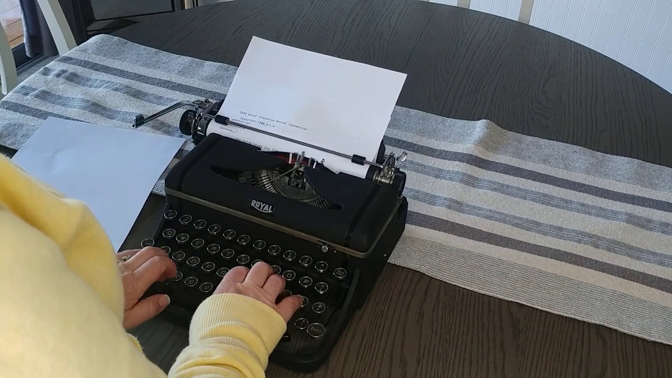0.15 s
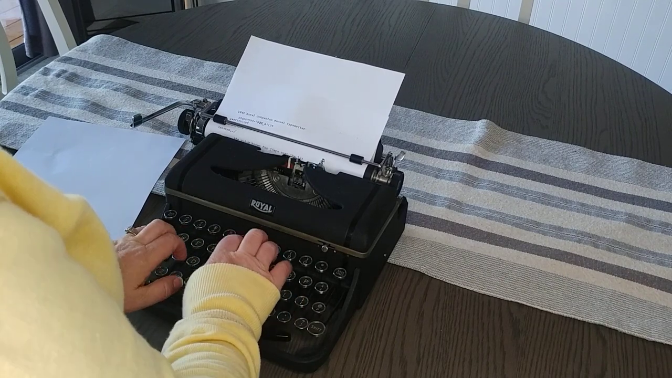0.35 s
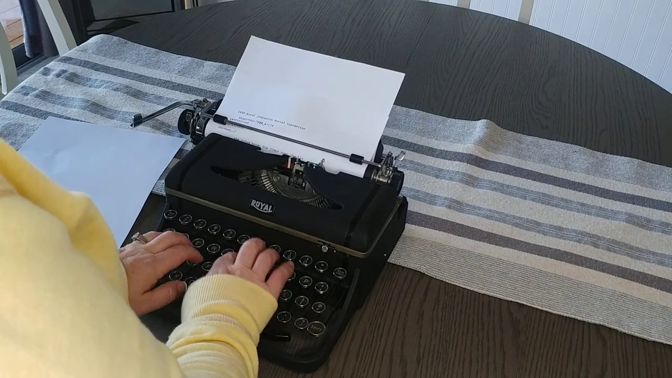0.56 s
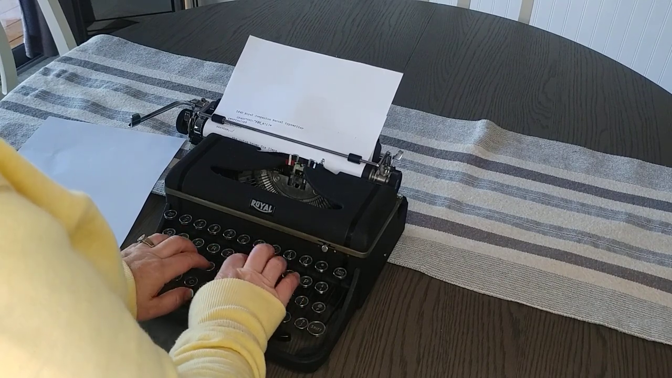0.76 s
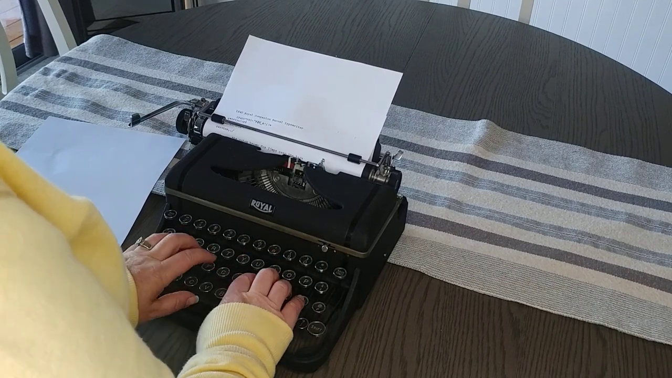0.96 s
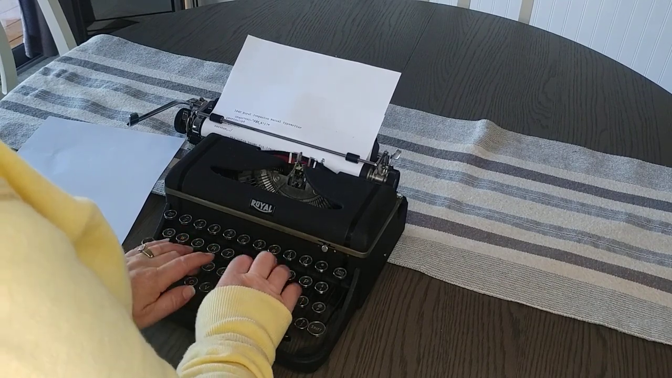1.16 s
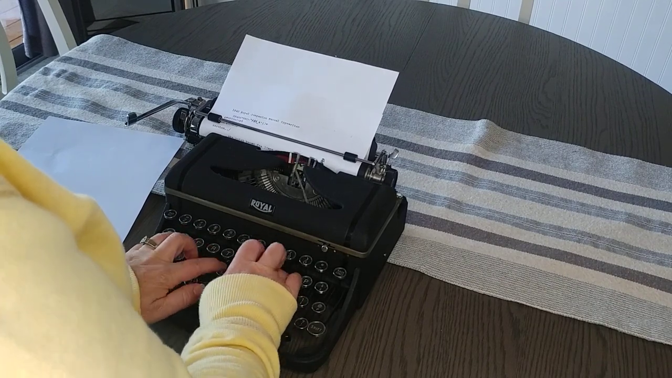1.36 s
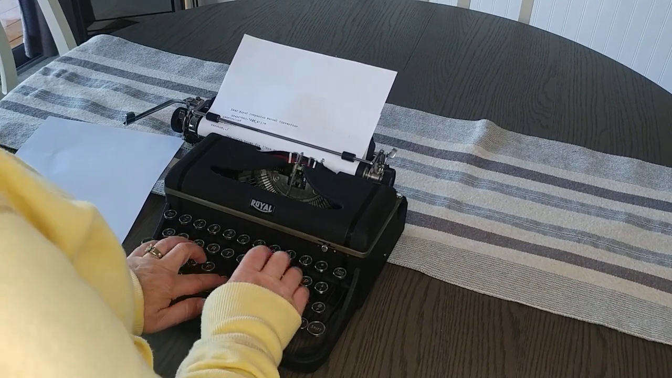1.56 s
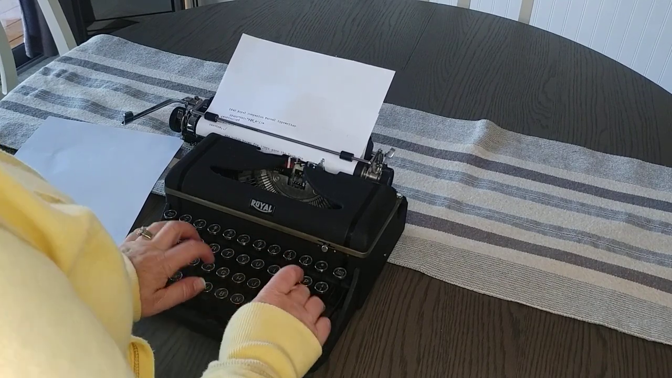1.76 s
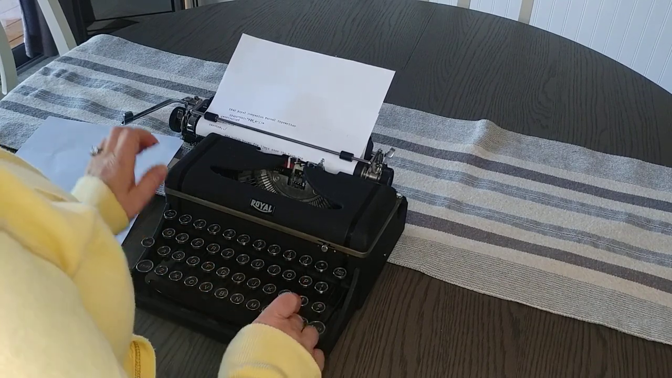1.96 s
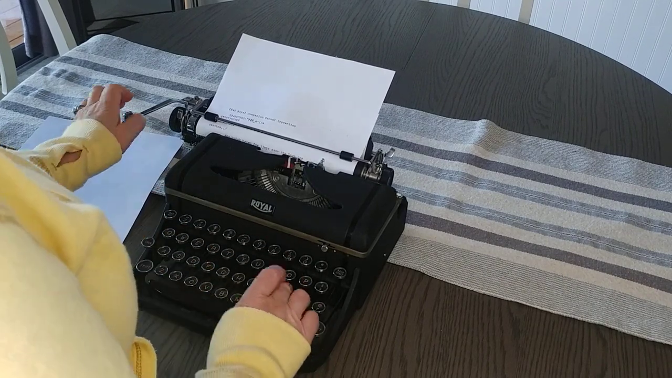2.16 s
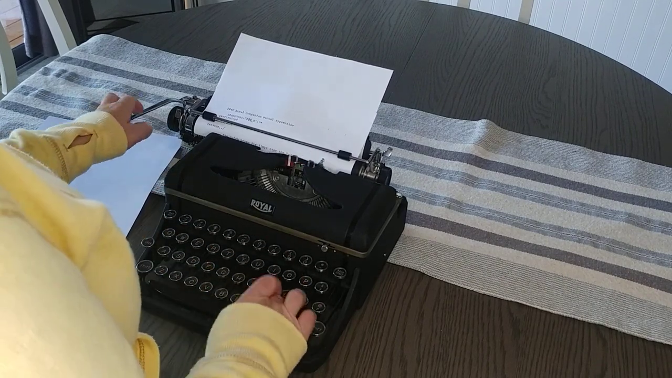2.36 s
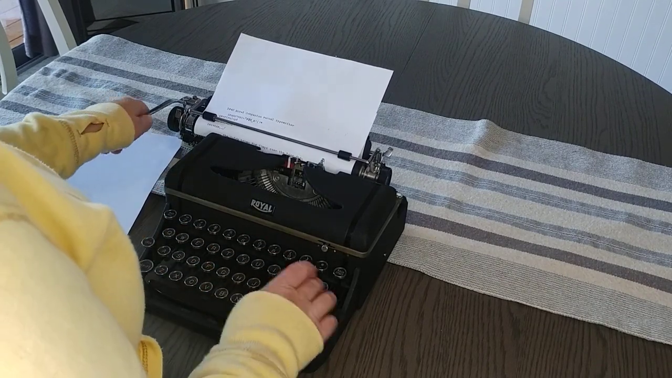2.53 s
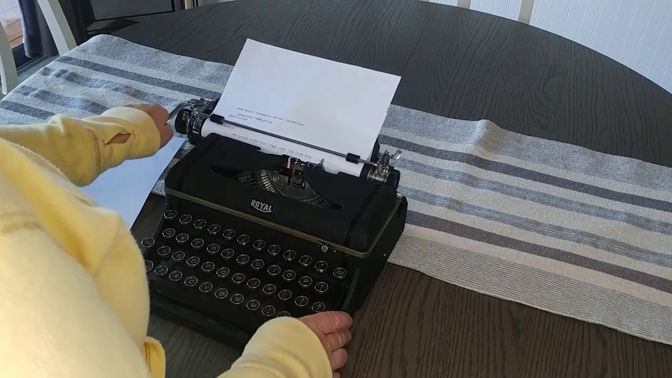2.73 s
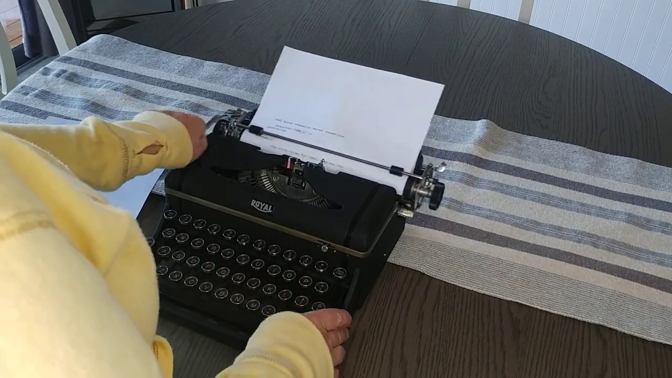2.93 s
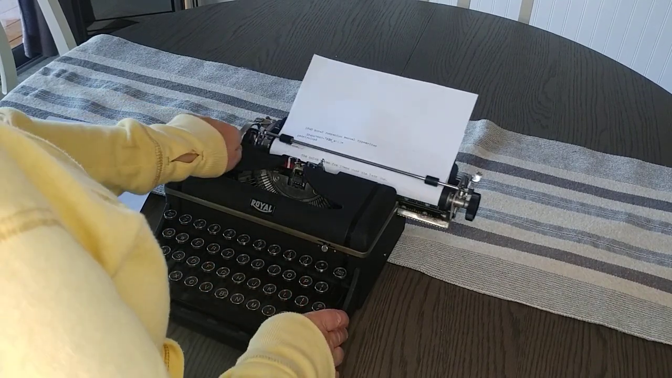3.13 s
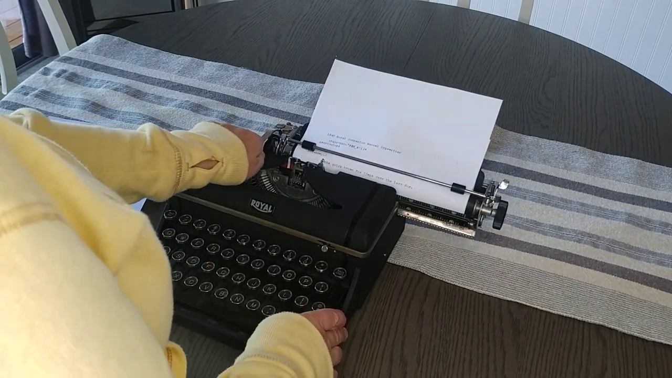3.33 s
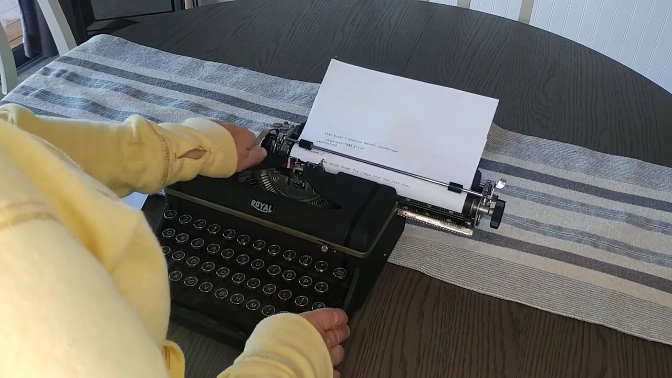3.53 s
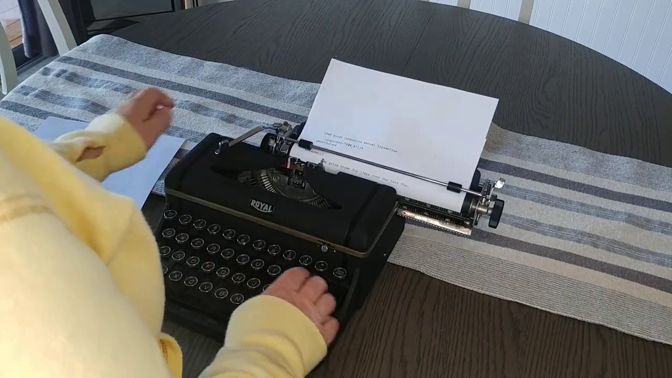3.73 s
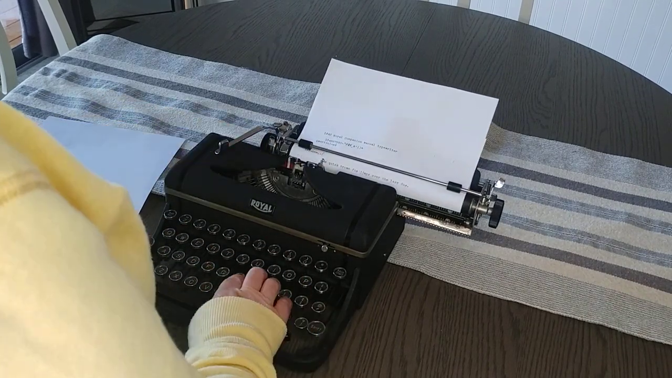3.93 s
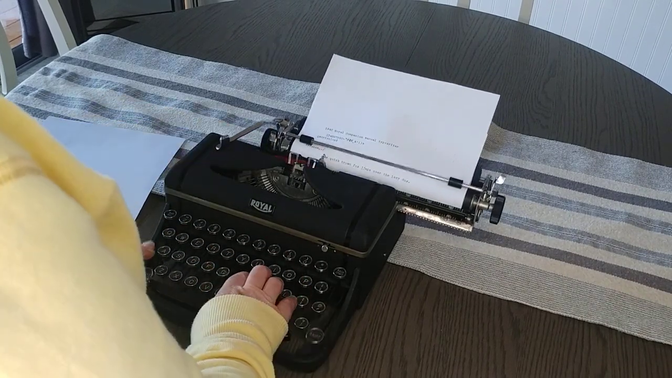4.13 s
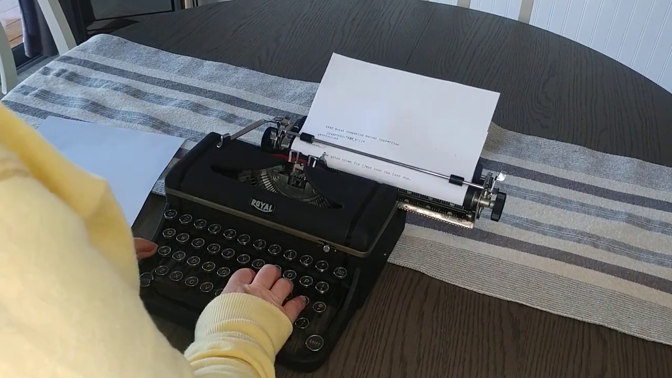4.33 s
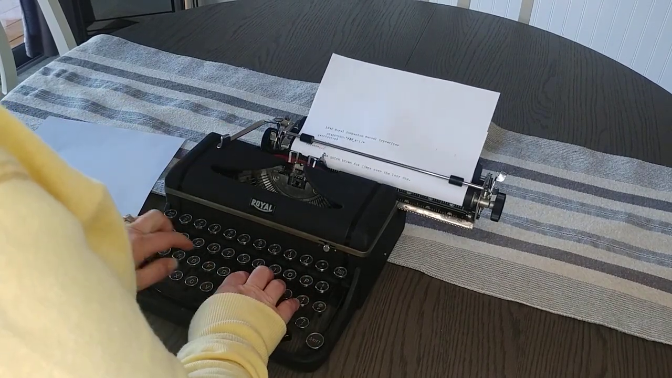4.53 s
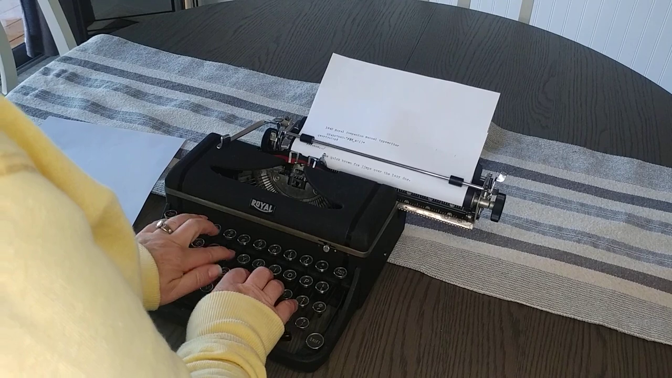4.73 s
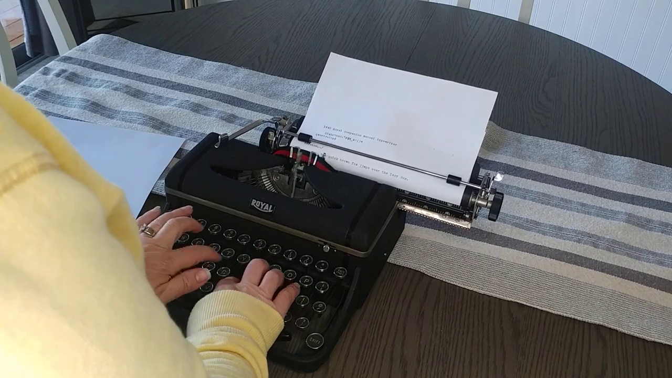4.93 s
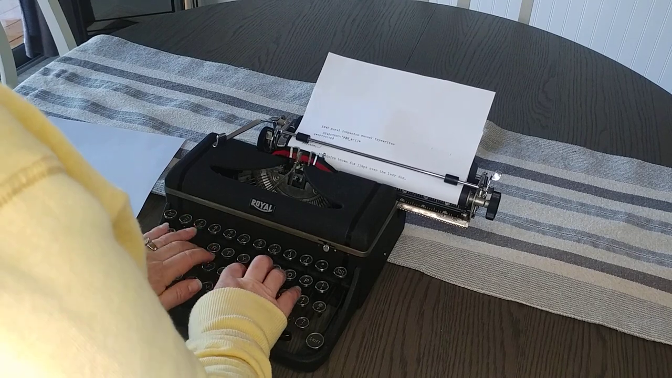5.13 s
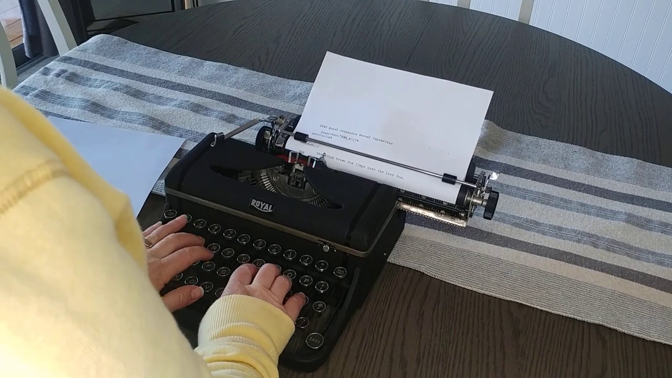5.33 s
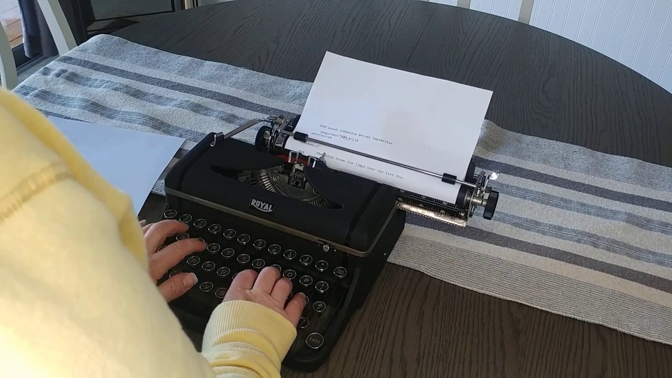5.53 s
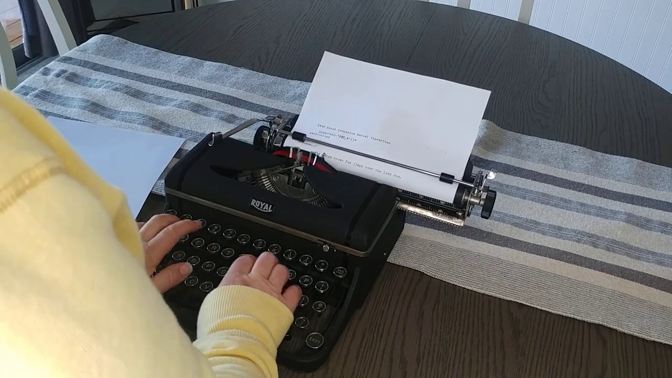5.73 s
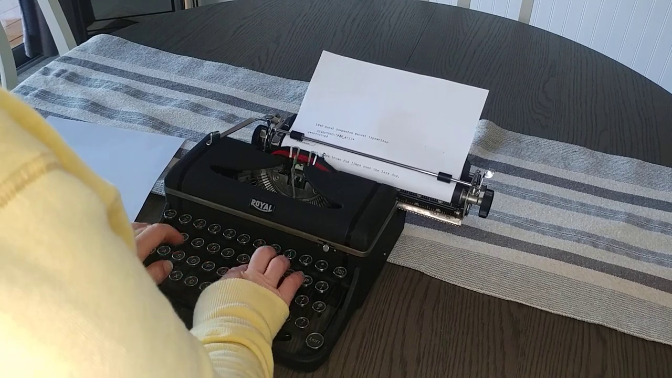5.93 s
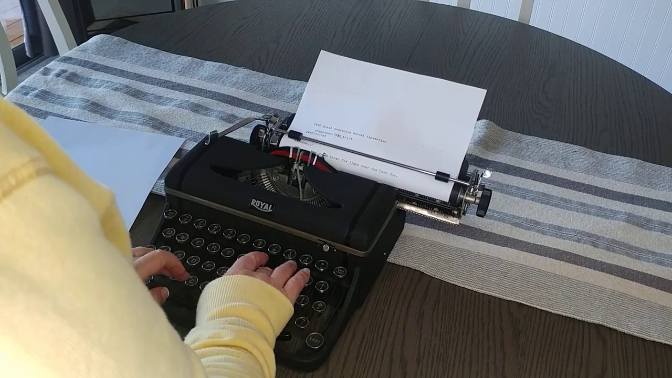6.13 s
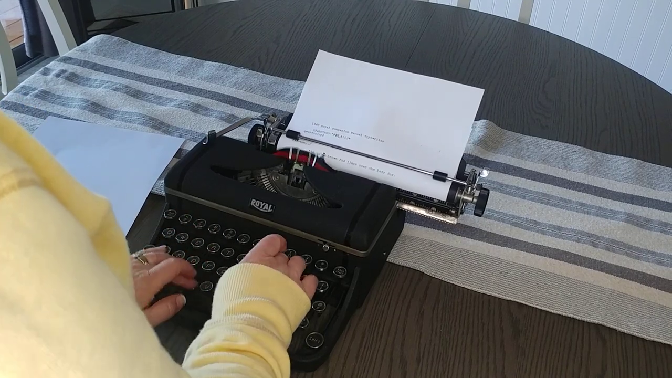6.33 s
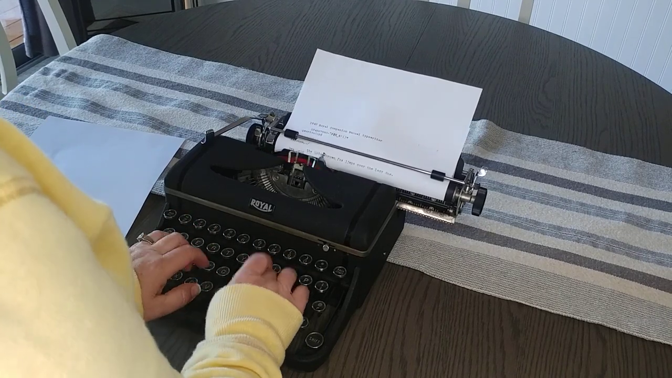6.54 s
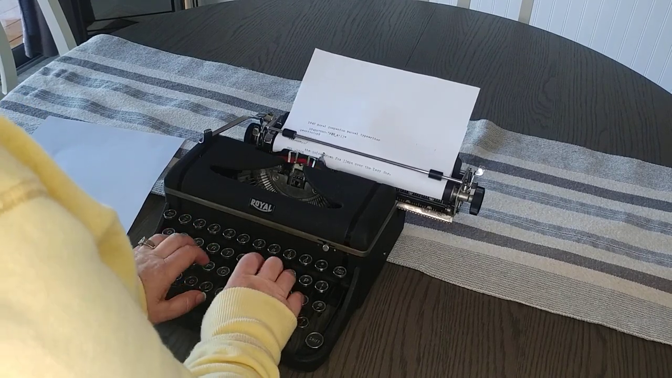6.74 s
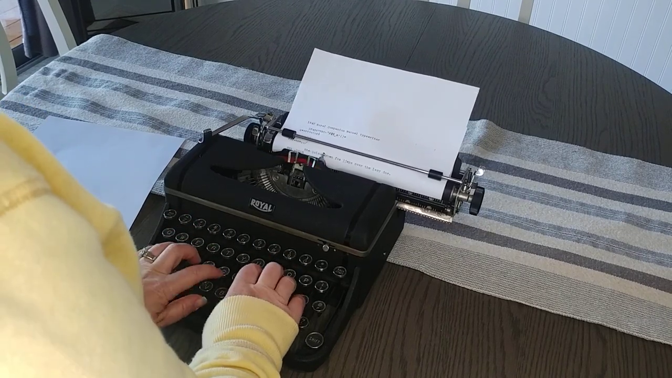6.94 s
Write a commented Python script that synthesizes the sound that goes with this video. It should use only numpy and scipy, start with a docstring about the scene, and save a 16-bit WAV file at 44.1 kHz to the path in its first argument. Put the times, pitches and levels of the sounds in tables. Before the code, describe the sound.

Heard from just behind the typist in a quiet, bare room, the typebars of a manual typewriter crack against the roller and drop back with small thuds. Midway the typing stops for a hissing, ratcheting carriage return, a few lever ticks and one deep thump that rattles the machine on its wooden table. Then comes another, more even run of crisp keystrokes, with occasional duller space bar clacks.

```python
"""A manual typewriter on a wooden table in a quiet, bare room, heard from over the typist's shoulder.
Each key swings a typebar (a steel rod carrying a letter) that cracks on the platen (the paper roller)
and drops back when the key is let go. Keystrokes and the space bar shake the table.
Midway the carriage is pushed back over its clicking ratchet, and a heavy knock booms through the table
before the typing goes on."""
import sys
import numpy as np
from scipy import signal
from scipy.fft import rfft, irfft
from scipy.io import wavfile
from scipy.ndimage import uniform_filter1d, minimum_filter1d

SR = 44100
rng = np.random.default_rng(int(sys.argv[2]) if len(sys.argv) > 2 else 0)


def unload_wav(signal):
    """Save mono or channel-first audio to the path in sys.argv[1] as 16-bit WAV at rate SR, clipped to [-1, 1]."""
    wavfile.write(
        sys.argv[1],
        SR,
        np.round(np.clip(np.atleast_2d(signal).T, -1, 1) * 32767).astype(np.int16),
    )


N = 312228
LEAD = SR // 4  # extra samples before the start, so that the first keystroke is already ringing
LENGTH = N + LEAD
TOP_HZ = 15700  # the treble is cut above this

# keystrokes: (time [s], level [dB], slap on the roller [relative dB], key held for [s])
KEYSTROKES = [(-0.046, -21.5, -1.5, 0.11), (0.2492, -22, 0, 0.13), (0.676, -16.5, -1, 0.1),
              (1.2199, -18.5, 0, .138), (1.3829, -16, -1, 0.12), (1.6329, -16.5, -1.5, 0.14),
              (2.3524, -23, 7.5, 0.098), (4.855, -21, -1.5, 0.095), (5.0133, -16.5, -6.5, 0.11),
              (5.2078, -18.5, -5, .151), (5.7518, -19.5, -4, .165), (5.979, -22.5, -2, .096),
              (6.2111, -19.5, -3.5, 0.14), (6.4357, -18.5, -4, 0.13), (6.6583, -20, -4, 0.12)]
# tone of loose metal rattling: (frequency [Hz], level [dB])
RATTLE_TONE = [(600, -11), (1500, -7), (3300, -1.5), (5000, -4), (7000, -5), (9200, 8), (10700, -11),
               (15500, -6)]
# space bar: (pressed [s], let go [s], back at its stop [s], clack level [dB])
SPACE_BAR = [(.938, 1.064, 1.084, -35.5), (5.482, 5.645, 5.652, -33), (6.873, 7.028, 7.044, -31.5)]
# ticks of the return lever and other loose levers: (time [s], level [dB], knock [relative dB])
LEVER_TICKS = [(2.733, -40, -6.5), (3.58, -50, -19.5), (3.68, -37.5, -13.5), (4.104, -48.5, -3.5),
               (4.476, -44.5, -9.5)]
# the carriage meets its stop: (time [s], level [dB], rattle [relative dB])
CARRIAGE_STOP = (3.631, -34, 1.55)


def undb(db):
    """Turn decibels into a number to multiply a sound by."""
    return 10 ** (np.asarray(db) / 20)


def on_log_axis(hz, points, values):
    """Join values by straight lines on a scale where every octave is equally wide."""
    return np.interp(np.log(hz + 1), np.log(points), values)


def convolve(x, response):
    """Pass a sound through something, given how that thing answers a single click."""
    return signal.oaconvolve(x, response)[:LENGTH]


def colour(x, tone, size=8192):
    """Give a sound a tone of (frequency [Hz], level [dB]) points; white noise keeps its power."""
    gains = undb(on_log_axis(np.fft.rfftfreq(size, 1 / SR), *np.transpose(tone)))
    cepstrum = irfft(np.log(gains))
    # fold the second half onto the first, so that nothing sounds before the hit
    cepstrum[1:size // 2] *= 2
    cepstrum[size // 2 + 1:] = 0
    response = irfft(np.exp(rfft(cepstrum)))
    return convolve(x, response / np.linalg.norm(response))


def fade(t, t60):
    """A smooth dying away; the fade time t60 is the seconds it takes to drop by 60 dB."""
    return np.exp(-np.minimum(np.log(1000) * t / t60, 50))


def ring(x, notes):
    """Make a sound ring in an object with its own fading notes; white noise keeps its power."""
    t = np.arange(SR) / SR
    response = sum(rng.choice([-1, 1]) * undb(db) * fade(t, t60) * np.sin(2 * np.pi * hz * t)
                   for hz, db, t60 in notes)
    return convolve(x, response / np.linalg.norm(response))


def blows(times, dbs, t60, size=32768):
    """The force of parts hitting each other: a fresh, fading burst of noise at each time."""
    force, t = np.zeros(LENGTH + 2 * size), np.arange(size) / SR
    envelope, taper = fade(t, t60), fade(t, 10 * t60)
    for at, db in np.broadcast(times, dbs):
        burst = rng.standard_normal(size) * envelope
        for _ in range(4):  # even out the frequencies while keeping the burst short
            spectrum = rfft(burst)
            burst = irfft(spectrum / (np.abs(spectrum) + 1e-12)) * taper
        start = max(LEAD + int(at * SR), 0)
        force[start:start + size] += undb(db) * burst * np.linalg.norm(envelope) / np.linalg.norm(burst)
    return force[:LENGTH]


def crack(at, db, slap_db):
    """A letter hits the paper: one short blow, bright from the steel, fuller as it slaps the roller."""
    # tones of the steel typebar and of the roller: (frequency [Hz], level [dB])
    typebar_tone = [(1200, -24), (3000, -13.5), (5000, -5.5), (6200, -3.5), (7200, -6.5), (8200, 0.5),
                    (9400, 3.5), (9900, 4), (10500, -9), (12000, -8), (15500, -17)]
    roller_tone = [(600, -22), (1800, -15), (2500, 1), (3300, 5.5), (4400, 6.5), (5500, 1.5), (7000, -6),
                   (10000, -28)]
    hz = np.linspace(100, SR / 2, 128)
    dulling_db = 0.84 * slap_db * (hz / TOP_HZ) ** 2  # a fuller slap softens the highest treble
    steel = undb(on_log_axis(hz, *np.transpose(typebar_tone)) - dulling_db)
    roller = undb(on_log_axis(hz, *np.transpose(roller_tone)) - 5.5 + slap_db)
    power = steel ** 2 + roller ** 2
    force = blows([at], [db + 31], t60=0.0032) * np.sqrt(power.mean())
    return colour(force, np.column_stack([hz, 10 * np.log10(power)]), size=1024)


def steel_ring(at, db, spread_db=2):
    """Every keystroke sets the same steel parts ringing, each time in a different mix."""
    # notes of the steel parts: (frequency [Hz], level [dB], fade time [s])
    steel_notes = [(3070, -6, .3), (3265, -1, .25), (3410, -4, .25), (3594, -1, 0.3), (4050, -1, .3),
                   (4320, -1, .3), (4463, 1, .3), (4622, -3, .3), (5815, -5, 0.3), (6217, -3.5, .3),
                   (8700, -4, .3), (9340, -2, .3), (9506, -1, .3), (9695, -1, 0.3)]
    offsets_db = spread_db * rng.standard_normal(len(steel_notes))
    notes = [(hz, level + offset, t60) for (hz, level, t60), offset in zip(steel_notes, offsets_db)]
    return ring(blows([at], [db], t60=0.0011), notes)


def typing():
    """Letters crack on the roller, the frame and steel answer, and the carriage rattles one step on."""
    # tone of the frame under a keystroke: (frequency [Hz], level [dB])
    body_tone = [(100, -2.5), (350, -1), (700, -7), (1000, -2), (1900, 1.5), (2600, 0), (5000, -17.5)]
    at, db, slap_db, _ = np.transpose(KEYSTROKES)
    cracks = sum(crack(*stroke) for stroke in zip(at, db, slap_db))
    body_db = -10 + 0.27 * db + 0.67 * slap_db  # the heavy frame mostly follows the slap
    body = colour(blows(at, body_db, t60=0.0093), body_tone)
    ringing = sum(steel_ring(*stroke) for stroke in zip(at, db + slap_db / 2 + 14))
    carriage_step = blows(at + 0.009, db - 3, t60=0.06)
    ribbon = blows(at - 0.009, db - 19, t60=0.12)  # the ink ribbon lifts just before the letter lands
    return cracks + body + ringing + colour(carriage_step + ribbon, RATTLE_TONE)


def ticks():
    """Ticks of fingers on keys, the space bar and levers: (time [s], level [dB], knock [relative dB])."""
    fingers = [(at - 0.032, -45.5, -6) for at, *_ in KEYSTROKES]
    bar = [(at, db - 12.5, -5.5) for down, let_go, _, db in SPACE_BAR for at in (down, let_go)]
    return np.transpose(fingers + bar + list(LEVER_TICKS))


def typebar_drops():
    """Typebars fall back as keys are let go, louder on the new line: (time [s], level [dB])."""
    at, _, _, held = np.transpose(KEYSTROKES)
    on_new_line = at > CARRIAGE_STOP[0]
    return at + held, -28.5 + 2.5 * on_new_line


def clacks():
    """The space bar and the carriage hit their stops: (time [s], level [dB], rattle [relative dB])."""
    return np.transpose([(up, db, -1) for _, _, up, db in SPACE_BAR] + [CARRIAGE_STOP])


def mechanism():
    """Keys, typebars, space bar, levers and carriage knock on the frame and shake loose metal."""
    # tones of a part landing on its rest and of the knock under a tick: (frequency [Hz], level [dB])
    thud_tone = [(60, -13.5), (150, -4.5), (300, -4), (450, -3.5), (680, -13.5), (800, -7.5), (1150, -9),
                 (1600, -10), (4000, -10.5), (12000, -19.5)]
    knock_tone = [(100, 0), (700, 0.5), (1100, -7.5), (1600, -5.5), (2400, -8.5), (6000, -28)]
    # notes of the frame: (frequency [Hz], level [dB], fade time [s])
    frame_notes = [(382, -5, .13), (445, -4, .12), (570, -6, .09), (648, 0, .12), (690, 0, .12),
                   (899, -8, .07)]
    drop, drop_db = typebar_drops()
    clack, clack_db, rattle_db = clacks()
    tick, tick_db, knock_db = ticks()
    hit, hit_db, _, _ = np.transpose(KEYSTROKES)
    thuds = blows(drop, drop_db - 9.5, t60=0.2) + blows(clack, clack_db - 6.5, t60=0.18)
    frame = blows(drop, drop_db - 4.5, t60=0.07) + blows(clack, clack_db, t60=0.04)
    frame += blows(hit, hit_db - 10.5, t60=0.024)
    metal = blows(clack, clack_db + rattle_db - 12, t60=0.065) + blows(tick, tick_db + 3.5, t60=0.019)
    knocks = blows(tick, tick_db + knock_db - 0.5, t60=0.25)
    return (colour(thuds, thud_tone) + ring(frame, frame_notes)
            + colour(metal, RATTLE_TONE) + colour(knocks, knock_tone))


def table_shake():
    """Keys, falling typebars and the stopping carriage shake the table; the space bar bumps both ways."""
    # tones of the shaking table and of a space bar bump: (frequency [Hz], level [dB])
    table_tone = [(18, -7.5), (33, 5), (48, -11), (65, 1.5), (90, -15), (130, -7.5), (190, -13), (300, -20),
                  (800, -47.5)]
    bump_tone = [(40, -12.5), (120, -5.5), (170, 0), (260, -22), (700, -27.5), (3000, -48.5)]
    hit, hit_db, _, _ = np.transpose(KEYSTROKES)
    drop, drop_db = typebar_drops()
    down, _, up, space_db = np.transpose(SPACE_BAR)
    stop, stop_db, _ = CARRIAGE_STOP
    shudder = blows(hit - 0.02, 0.15 * hit_db - 35, t60=0.6)
    shudder += blows(drop + 0.015, drop_db - 12.5, t60=0.46)
    jolt = blows([stop + 0.022], [stop_db + 1], t60=0.16)
    bumps = blows(down, space_db - 9, t60=0.38) + blows(up + 0.025, space_db - 6.5, t60=0.44)
    return colour(shudder + jolt, table_tone) + colour(bumps, bump_tone)


def air():
    """A low room rumble, the same left and right, plus a faint separate hiss on each side."""
    # tone of the quiet room: (frequency [Hz], level [dB])
    rumble_tone = [(12, -33.5), (20, -1), (70, 3.5), (127, -11), (182, -4.5), (234, -12.5), (542, -22.5),
                   (1400, -40), (3070, -48), (8890, -48.5), (10500, -52), (14700, -49.5), (16000, -49.5)]
    rumble = undb(-51.5) * colour(rng.standard_normal(LENGTH), rumble_tone)
    return rumble + undb(-80.5) * rng.standard_normal((2, LENGTH))


def levers():
    """Flicked levers ring briefly as they tick."""
    # notes of a lever: (frequency [Hz], level [dB], fade time [s])
    lever_notes = [(1577, 0, .1), (1790, -4, .06), (2288, -9, .08)]
    at, db, knock_db = np.transpose(LEVER_TICKS)
    return ring(blows(at, db + knock_db + 16.5, t60=0.0018), lever_notes)


def carriage_return(full_push_db=-38.5):
    """A catch clicks over teeth as the carriage hisses on its rail; a harder push is faster and louder."""
    # how hard the carriage is pushed: (time [s], level [dB])
    push = [(2.8, -47), (2.99, -40), (3.052, -41.5), (3.068, -37), (3.102, -46.5), (3.306, -43),
            (3.402, -54), (3.46, -82)]
    # tones of the ratchet teeth and of the rail: (frequency [Hz], level [dB])
    ratchet_tone = [(3000, -19.5), (7200, -21), (8300, -0.5), (9600, 0.5), (10500, -15), (15500, -7.5)]
    rail_tone = [(500, -7), (1300, -18), (1850, -1), (2300, -4.5), (3200, 1), (4000, -4.5), (5200, -7.5),
                 (6200, -2), (7100, -7), (9400, -1.5), (10800, -6), (15500, -6.5)]
    t = (np.arange(LENGTH) - LEAD) / SR
    times, push_db = np.transpose(push)
    effort_db = np.interp(t, times, push_db) - full_push_db
    moving = uniform_filter1d(1.0 * ((t > times[0]) & (t < times[-1])), size=600)
    teeth_per_s = 95 * undb(0.9 * effort_db)
    teeth_passed = np.cumsum(teeth_per_s) / SR
    into_tooth = teeth_passed % 1  # runs from 0 to 1 between clicks
    tooth_db = 2.6 * rng.standard_normal(4096)[teeth_passed.astype(int)]  # no two teeth catch alike
    clicks = rng.standard_normal(LENGTH) * np.exp(-into_tooth / 0.2) * undb(tooth_db - 31 + effort_db)
    pulsing = 1 + 0.97 * np.exp(-into_tooth / 0.27)
    hiss = rng.standard_normal(LENGTH) * pulsing * undb(-47 + 0.88 * effort_db)
    return colour(clicks * moving, ratchet_tone) + colour(hiss * moving, rail_tone)


def heavy_thump():
    """A heavy knock booms through the table and rattles the machine, then a faint low thud follows."""
    # the bumps of the knock and the faint thud after it: (time [s], level [dB], rattle [relative dB])
    bumps = [(4.231, -29.5, 12.5), (4.249, -18.5, 4), (4.271, -37, -18.5), (4.335, -37, -31),
             (4.49, -49.5, -25)]
    # tone of the thump: (frequency [Hz], level [dB])
    thump_tone = [(20, -8), (38, -8.5), (170, -6), (209, -11.5), (275, -8.5), (325, -14.5), (445, -14.5),
                  (650, -8), (750, -19), (1200, -25), (3000, -26.5), (6000, -36)]
    # notes of the table top and of the machine's cover: (frequency [Hz], level [dB], fade time [s])
    table_notes = [(35, 4, 0.33), (66.8, -4, 0.25), (288, -11, 0.4), (450, -8, 0.35), (545, -6, 0.27),
                   (665, -9, .3)]
    cover_notes = [(1570, -6, 0.07), (3190, 5, 0.05), (3330, 2, 0.05)]
    at, db, rattle_db = np.transpose(bumps)
    kicks = np.bincount(LEAD + (at * SR).astype(int), undb(db + 29.5), LENGTH)  # one spike per bump
    boom = colour(blows(at, db + 3, t60=0.13), thump_tone) + ring(kicks, table_notes)
    ping = ring(blows(at + 0.006, db + 3, t60=0.0019), cover_notes)
    rattle = colour(blows(at, db + rattle_db - 4.5, t60=0.05), RATTLE_TONE)
    return boom + ping + rattle


def room(x, right_lag_s=0.00003):
    """Sound reaches left and right directly, then as a few early echoes, then as a fading wash."""
    # echoes off table, walls and ceiling: (delay [s], level [dB])
    echoes = [(.005, -5.5), (.0063, -17.5), (.007, -13), (.0098, -3.5), (.0102, -3), (0.0147, -0.5),
              (0.0155, -26), (0.025, -18)]
    # wash of late echoes: (frequency [Hz], level [dB], fade time [s], left-right likeness [-1 to 1])
    wash_bands = [(60, -5.5, 0.4, 0.96), (250, -2, 0.33, .88), (630, -2.5, 0.35, 0.67), (1398, -4, 0.41, 0),
                  (3520, -1, 0.43, -.1), (9500, -3.5, 0.37, 0.01), (15000, -6, 0.3, 0.09)]
    t = np.arange(SR) / SR
    hz = np.fft.rfftfreq(SR, 1 / SR)
    points, wash_db, fade_times, likeness = np.transpose(wash_bands)
    alike = np.clip(on_log_axis(hz, points, likeness), -1, 1)
    mid, side = rfft(rng.standard_normal((2, SR)))
    wash = mid * np.sqrt((1 + alike) / 2) + np.array([[1], [-1]]) * side * np.sqrt((1 - alike) / 2)
    response = np.zeros((2, SR))
    for share, db, t60 in zip(np.eye(len(points)), wash_db, fade_times):
        band = irfft(wash * on_log_axis(hz, points, share))
        envelope = fade(t, t60) * np.clip((t - 0.003) / 0.027, 0, 1)
        response += undb(db) * band * envelope / np.linalg.norm(envelope)
    early = np.zeros((2, SR))
    for delay, db in echoes:
        smear = fade(np.abs(t - delay), t60=0.006) * (t >= delay)  # furniture and walls blur each echo
        early += undb(db) * rng.standard_normal((2, SR)) * smear / np.linalg.norm(smear)
    # small surfaces reflect little bass
    response += signal.lfilter(*signal.butter(2, 700, "high", fs=SR), early)
    # the direct sound is a little louder and earlier on the left
    response[0, 0] += undb(2.64)
    response[1, int(right_lag_s * SR)] += undb(-0.16)
    return np.array([convolve(x, ear) for ear in response])


def scene():
    """The typewriter and the table, heard in the quiet room."""
    sources = typing() + mechanism() + levers() + table_shake() + heavy_thump() + carriage_return()
    return (room(sources) + air())[:, LEAD:]


def record(dry, ceiling=0.92, hold_s=0.00094):
    """A fast limiter turns the loudest cracks down for an instant; then the highest treble is cut."""
    size = int(hold_s * SR)
    gain = ceiling / np.maximum(np.abs(dry), ceiling)
    gain = uniform_filter1d(minimum_filter1d(gain, size), size)
    treble_cut = signal.ellip(10, 0.2, 70, TOP_HZ, fs=SR, output="sos")
    return signal.sosfilt(treble_cut, dry * gain)


dry = scene()
out = record(dry)
unload_wav(out)
```